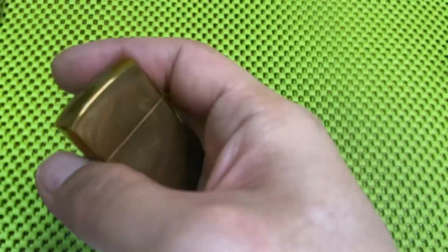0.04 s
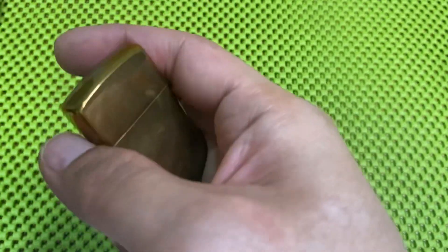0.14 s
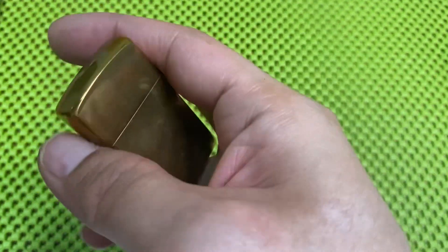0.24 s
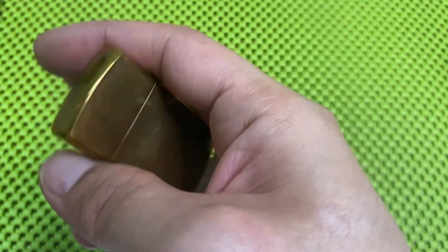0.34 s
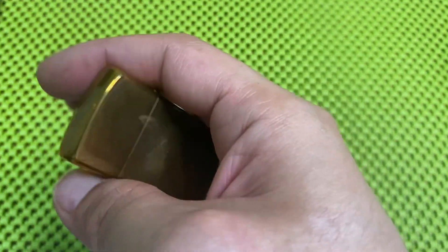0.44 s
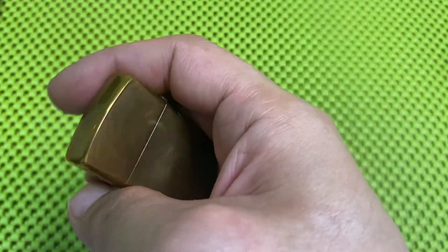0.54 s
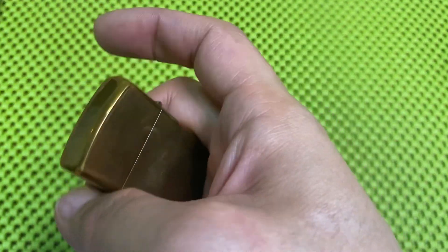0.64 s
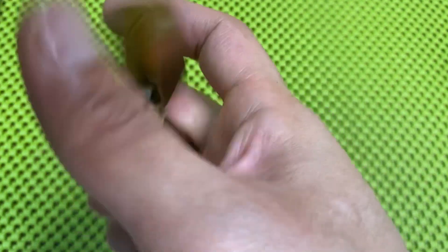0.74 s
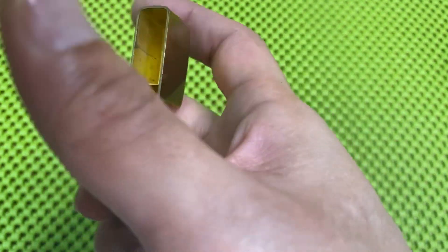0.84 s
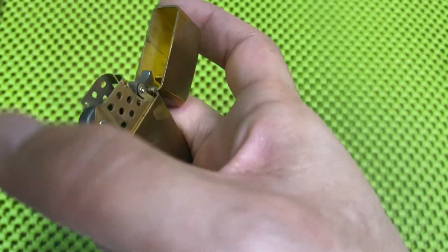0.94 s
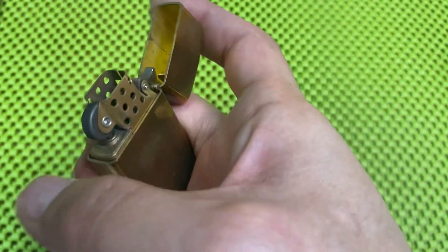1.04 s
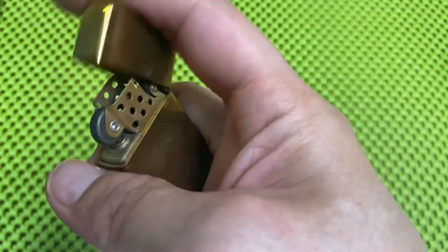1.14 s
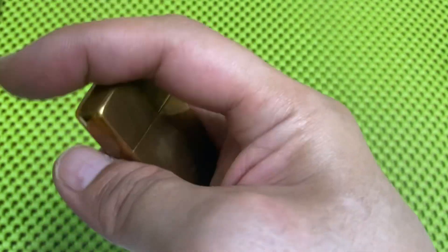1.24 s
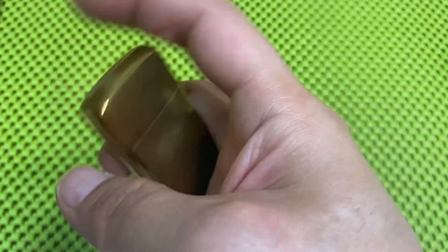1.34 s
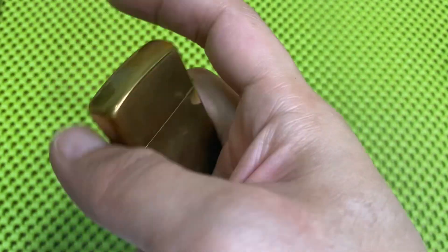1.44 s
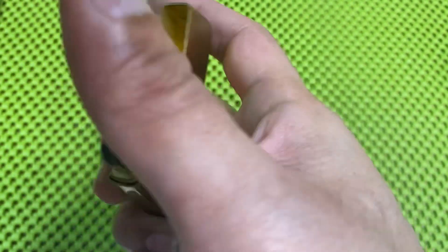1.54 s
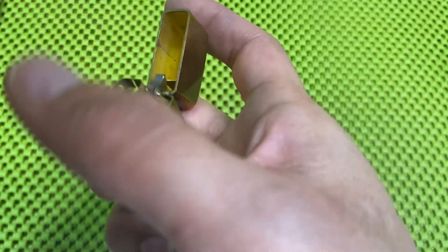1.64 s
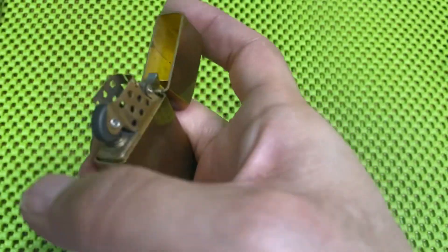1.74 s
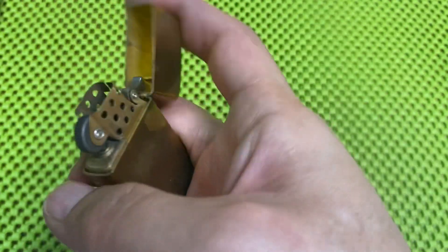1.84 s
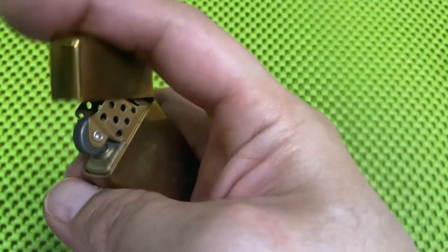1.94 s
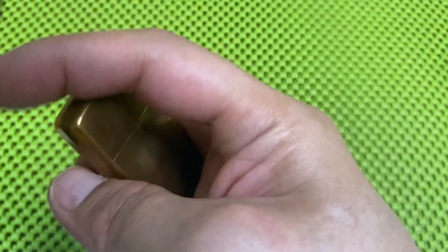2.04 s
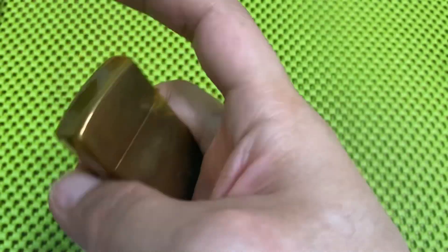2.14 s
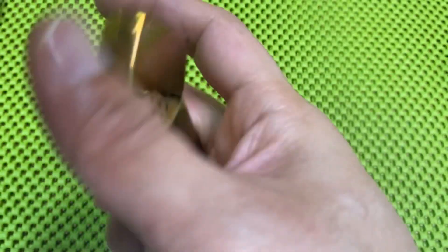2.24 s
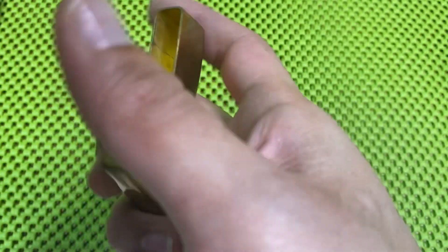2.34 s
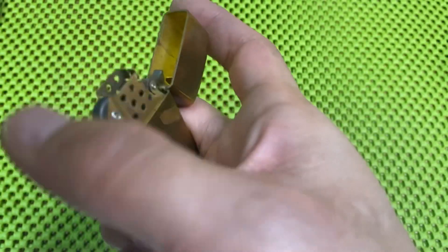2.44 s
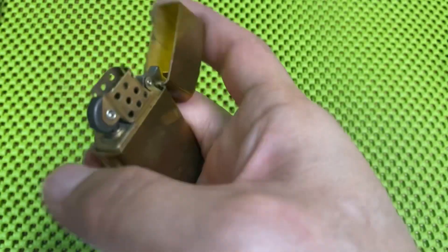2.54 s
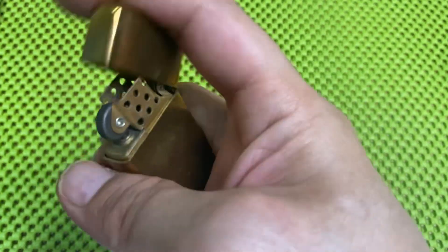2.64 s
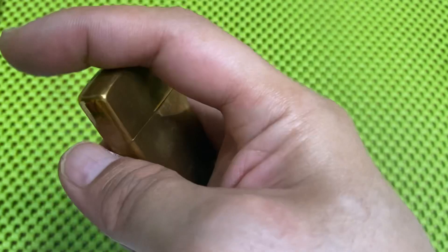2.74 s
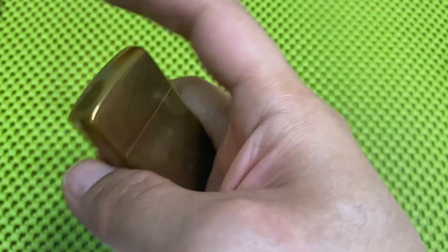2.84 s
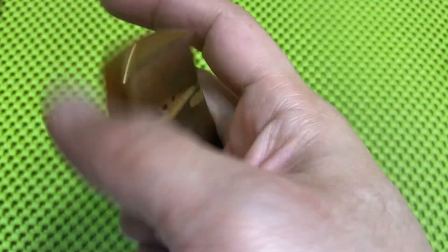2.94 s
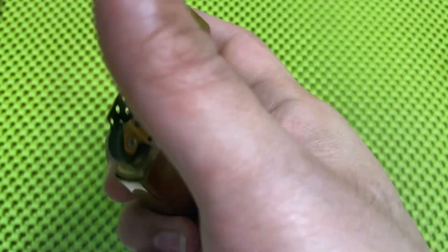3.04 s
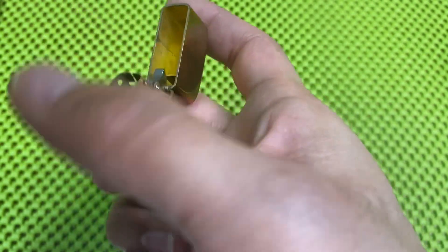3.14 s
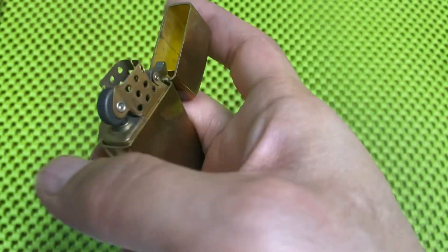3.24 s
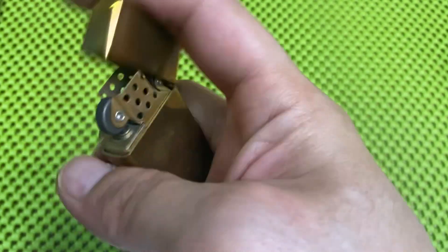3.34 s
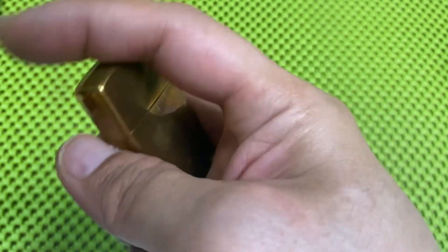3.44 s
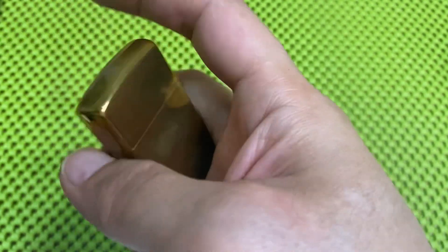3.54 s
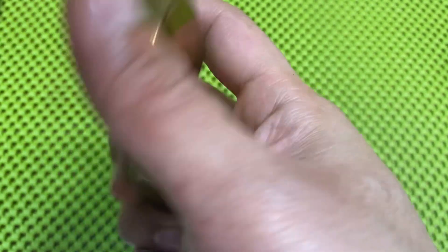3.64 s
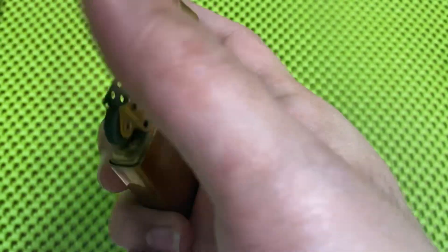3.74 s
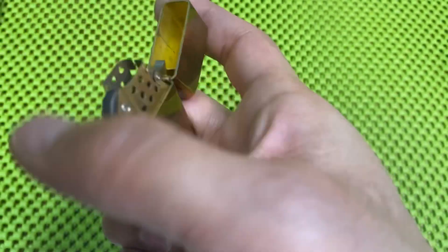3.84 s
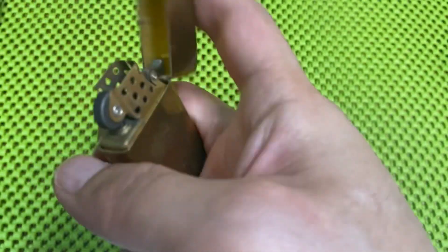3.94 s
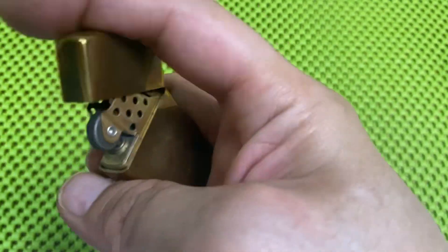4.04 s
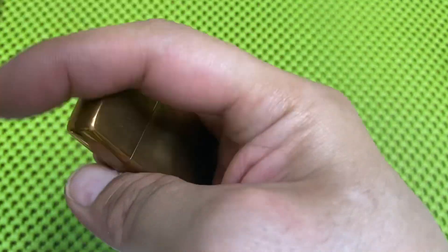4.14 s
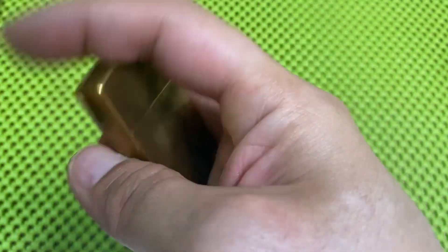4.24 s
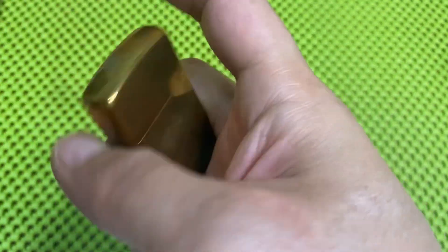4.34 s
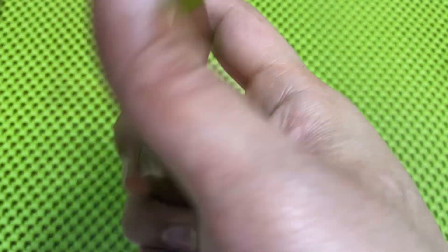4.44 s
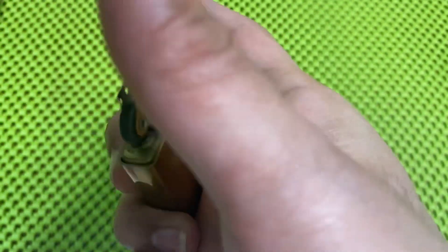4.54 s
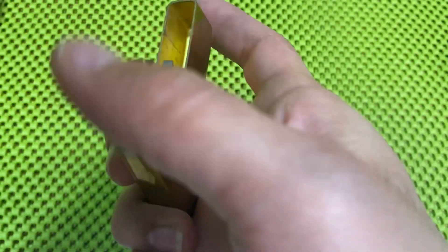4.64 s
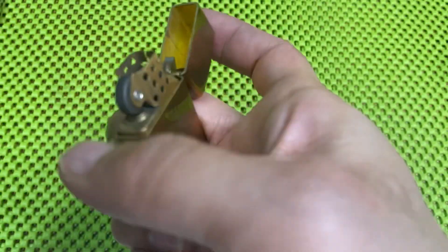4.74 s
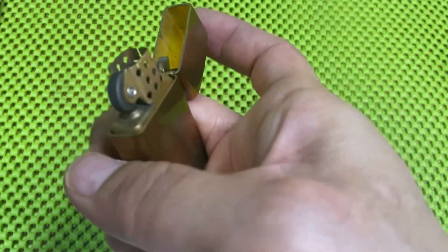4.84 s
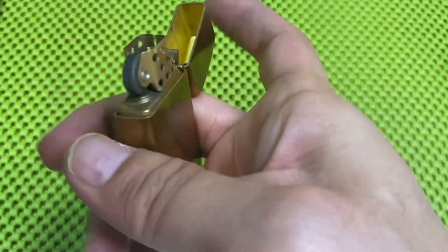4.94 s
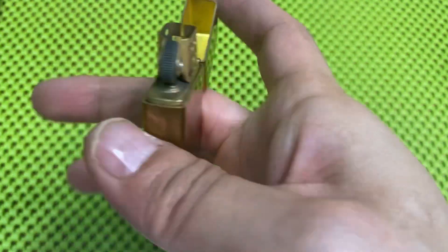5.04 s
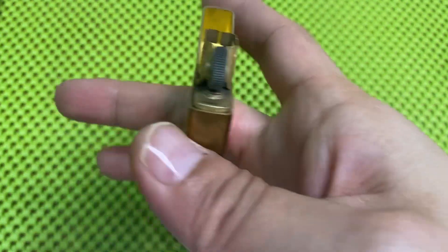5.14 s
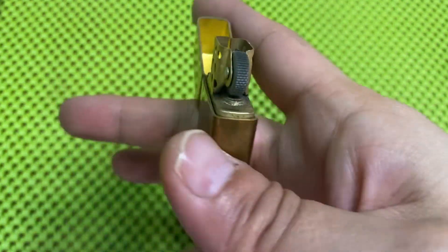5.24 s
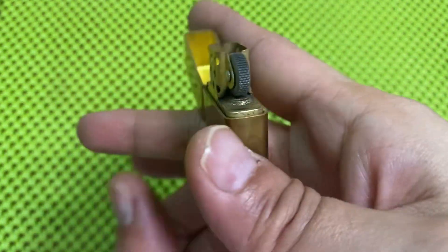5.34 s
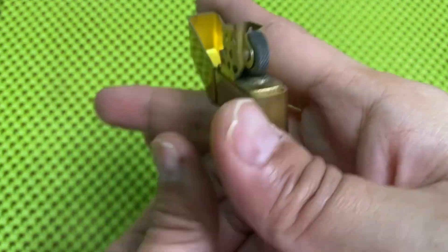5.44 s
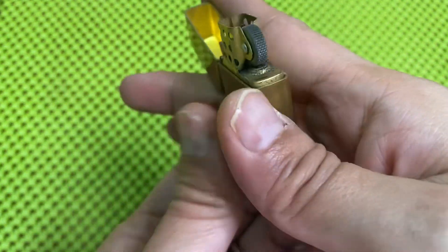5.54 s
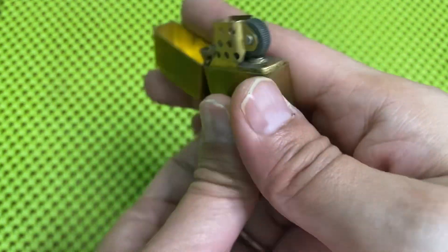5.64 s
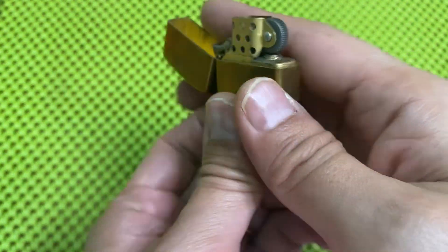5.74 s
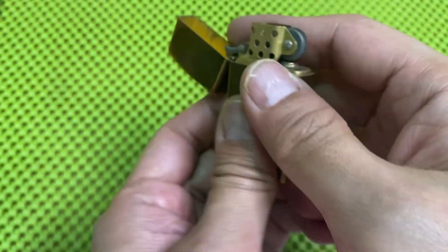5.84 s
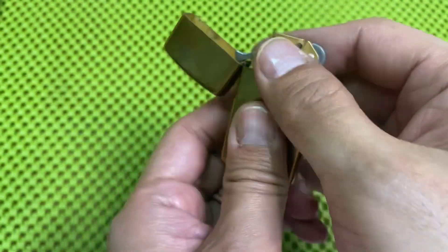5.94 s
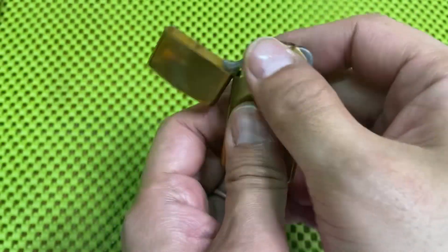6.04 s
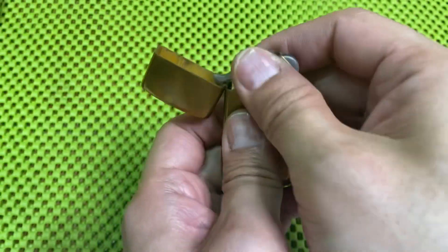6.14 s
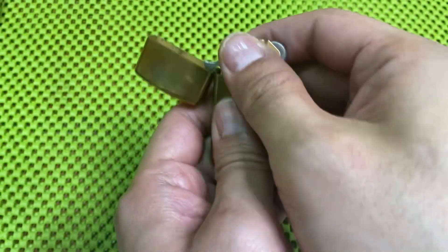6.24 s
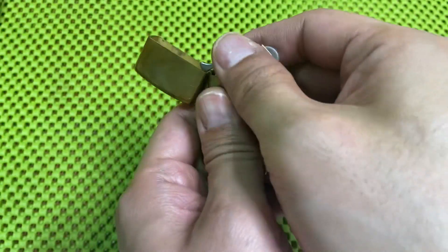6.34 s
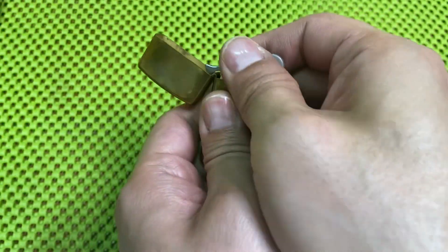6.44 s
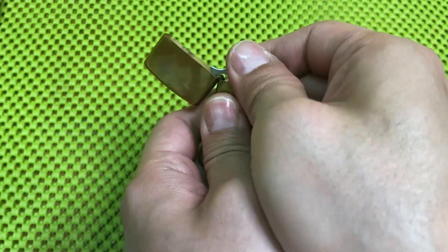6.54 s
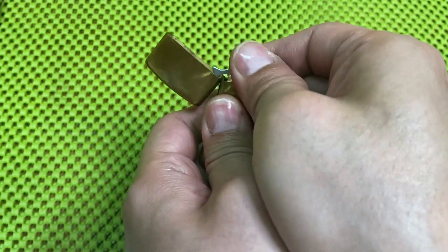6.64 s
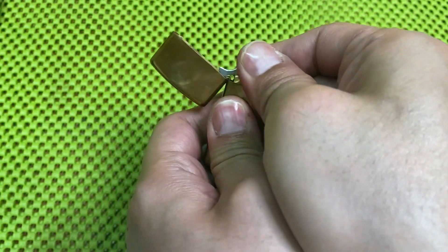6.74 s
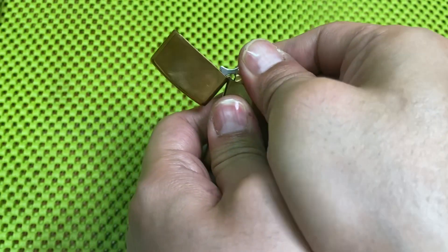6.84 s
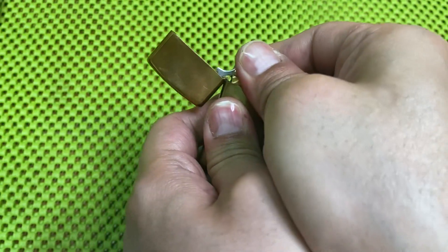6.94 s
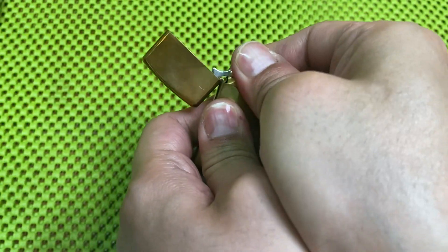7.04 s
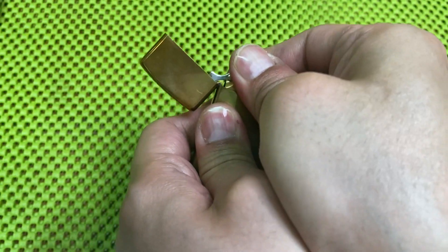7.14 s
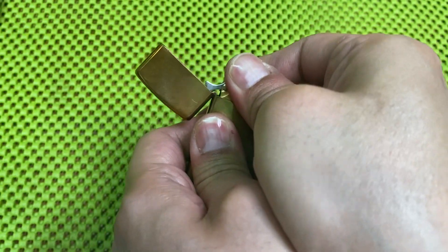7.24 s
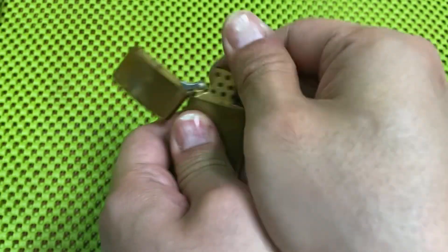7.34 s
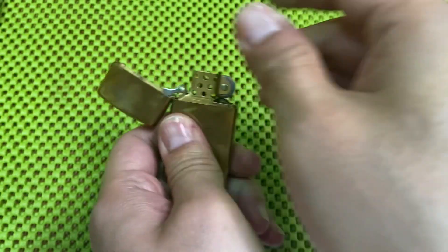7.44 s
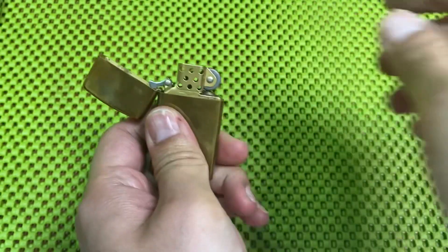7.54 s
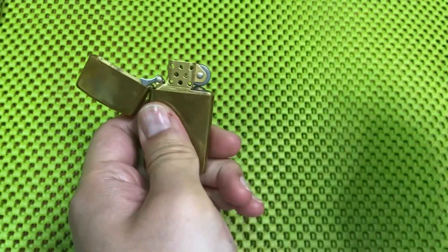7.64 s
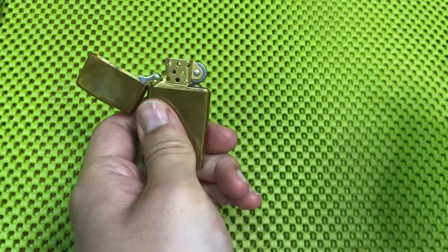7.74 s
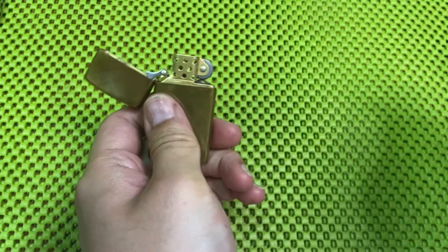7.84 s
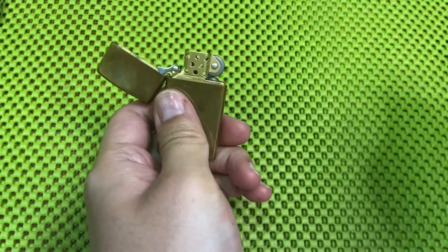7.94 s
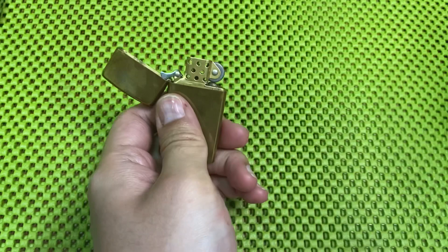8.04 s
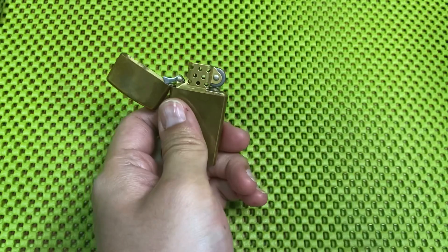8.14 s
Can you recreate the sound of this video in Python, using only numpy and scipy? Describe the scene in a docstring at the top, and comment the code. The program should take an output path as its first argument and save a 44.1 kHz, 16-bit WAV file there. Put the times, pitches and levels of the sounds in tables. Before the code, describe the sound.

A brass flip-top lighter is worked close to the microphone in a quiet room. At about 0.7 seconds the lid flicks open with a sharp click and a thin, high metallic ring, and at 1.2 seconds it snaps shut with a harder, fuller clack. The pattern repeats evenly: the lid opens at about 1.5, 2.3, 3.0, 3.6 and 4.4 seconds, and shuts at 2.0, 2.7, 3.4 and 4.1 seconds. Each snap leaves a brief, bright reverberant tail, with light hinge ticks in between. The last opening rings away by about 5 seconds. From 5.6 to 6.3 seconds fingers rub very faintly on the metal, and tiny ticks follow near 6.5 and 7.3 seconds. A soft low rumble and a wavering machine hum lie underneath, the hum growing slightly from about 6.5 seconds until the end at around 8 seconds.

```python
"""Brass lighter, flicked and shut

A flip-top lighter is opened and shut close to a microphone, then turned over in the hands.
Opening, the sprung cam snaps and the free lid rings; shutting, it snaps and the lid slams on the case.
Each snap leaves a bright reverberant wash; the gain control ducks after slams.
Two low machine hums beat in the quiet room."""
import sys
import numpy as np
from scipy import signal
from scipy.fft import rfft, irfft, next_fast_len
from scipy.io import wavfile
from scipy.ndimage import uniform_filter1d, map_coordinates

SR = 44100
rng = np.random.default_rng(int(sys.argv[2]) if len(sys.argv) > 2 else 0)


def pcm_store(signal):
    """Save signal as 16-bit PCM."""
    levels = np.round(np.clip(np.atleast_2d(signal), -1, 1) * 32767)
    wavfile.write(sys.argv[1], SR, levels.astype(np.int16).T)


N = 361179
CLOCK_S = np.arange(N) / SR
AGE_S = np.arange(SR) / SR  # the second after a blow

# Each row: time in seconds, relative rumble level in dB.
RUMBLE_LEVELS = [(0.0, -55.5), (1.5, -59.5), (5.29, -60), (5.77, -57), (8.19, -57.5)]
# Each row: time in seconds, relative levels of the lower and upper hum in dB.
HUM_LEVELS = [(0.0, -61.5, -50), (0.46, -50.5, -52.5), (0.96, -73, -53.5), (2.33, -74.5, -68.5),
              (3.13, -45.5, -59.5), (3.53, -65.5, -57.5), (3.83, -52.5, -60.5), (5.02, -68, -55.5),
              (5.22, -54, -62), (6.59, -47, -43.5), (6.75, -47.5, -41), (8.19, -42.5, -49)]
# Light touches. Each row: start in seconds, relative levels of tick and knock in dB.
TOUCHES = [(.693, -61.5, -74), (0.7637, -38, -46), (1.104, -45, -64), (1.526, -47.5, -58),
           (1.885, -46, -67), (2.599, -48, -77), (3.319, -43.5, -65.5), (3.963, -43, -78),
           (4.476, -38, -47), (4.855, -64.5, -58), (6.532, -62.5, -73), (7.336, -56.5, -68)]
# Each row: start in seconds, relative levels of snap, ring, thump and wash in dB.
OPENINGS = [(0.7419, -11, -25, -23.5, -42), (1.4913, -12.5, -24.5, -19.5, -43),
            (2.2538, -14.5, -23, -24.5, -45.5), (2.9675, -12.5, -24, -21.5, -43.5),
            (3.6453, -17, -24, -29, -44.5), (4.4473, -16, -24.5, -36.5, -44.5)]
# Each row: start in seconds, relative levels of snap, slam, case ring, knock, thump and wash in dB.
SHUTTINGS = [(1.2025, -10.5, -11, -27, -18.5, -16, -34.5), (1.9791, -6, -14, -23.5, -26.5, -33, -33),
             (2.6948, -6.5, -22, -34.5, -23, -24.5, -36), (3.3870, -8, -16, -18.5, -44, -24, -34),
             (4.1290, -5.5, -17, -22, -33, -48, -34)]
# Finger slides. Each row: start in seconds, length in seconds, relative level in dB.
STROKES = [(5.59, 0.078, -73), (5.705, 0.16, -75.5), (5.858, 0.12, -78.5), (6.018, 0.078, -76.5),
           (6.213, .11, -77), (7.317, 0.076, -72)]

# Modes. Each row: frequency in Hz, relative level in dB, T60 in seconds.
LID_MODES = [(3200, -14, .08), (3198, -22, .62), (7197, -25, .55), (7273, -19, .58), (7350, -1, .022),
             (7425, -22, .55), (8414, -6, .03), (10220, -3, .085), (10240, -26, .5), (11585, 2.5, .062),
             (11600, -22, .48), (13500, 5, .008), (15560, -5, .03)]  # lid open
CAM_MODES = [(10300, -10, .016), (11580, -1, .018), (11720, -7, .018), (13450, -5, .008), (15000, -9, .014),
             (15500, -8, .018)]  # cam and spring
CASE_MODES = [(2400, -3.5, .028), (2880, -3, 0.048), (3450, -7, 0.023), (4193, -5.5, 0.03),
              (4500, -10, 0.011), (7800, -8, .015)]  # shut, damped by the hand
# Peaks in the open lid's wash. Each row: centre in Hz, width in Hz, relative level in dB, T60 in seconds.
WASH_PEAKS = [(3230, 150, -3.5, .68), (7310, 260, 2.5, .7), (10220, 90, -4, .45), (11590, 80, -6, .38)]

# Noise spectra. Each row: frequency in Hz, relative density in dB.
ROOM_SPECTRUM = [(15, -42), (25, -16.5), (58, -8), (87, -4.5), (105, -16), (130, -11), (236, -15.5),
                 (416, -26.5), (887, -37), (1610, -39.5), (2550, -52.5), (3160, -54), (8830, -74),
                 (11300, -69.5), (16000, -77.5)]
SHUT_WASH_SPECTRUM = [(300, -30.5), (1000, -15.5), (2200, -10.5), (2450, -1), (4000, 2), (4700, 3),
                      (5500, 1), (8000, 2.5), (9200, -16.5), (10200, 4.5), (11600, 2.5), (12700, -12.5),
                      (14200, -6), (15600, 0), (16100, -37.5)]
TICK_SPECTRUM = [(200, -30), (1400, -15.5), (2600, -31), (3300, 7), (4300, -4.5), (5800, -7.5), (7400, 7),
                 (9000, -15.5), (10400, 0), (15500, -11.5), (17000, -32)]
KNOCK_SPECTRUM = [(150, -28), (500, -3), (850, -3.5), (1200, 1), (1800, -0.5), (2400, -6), (5000, -37)]
SWELL_SPECTRUM = [(200, -15), (1200, -6.5), (2700, 0), (5000, -5), (7500, 7.5), (9500, -8), (11600, -3.5),
                  (13000, -9.5), (15500, -5.5), (16500, -35.5)]
SNAP_SPECTRUM = [(100, -35), (700, -26.5), (1400, -7), (2200, -22.5), (3500, -5.5), (6000, -17.5),
                 (8200, -18), (12000, -1), (13500, 2.5), (15500, -2), (17000, -30.5)]
OPEN_WASH_SPECTRUM = [(200, -25), (1500, -13.5), (2400, -15), (2850, -12.5), (3400, 9), (5000, -4.5),
                      (6600, -3.5), (8000, -2.5), (9300, -13.5), (11000, 3), (12300, -9.5), (13500, 3.5),
                      (15600, -2), (16200, -33)]
SLAM_SPECTRUM = [(150, -30), (400, -14), (1000, -14.5), (1900, -8), (2600, -3), (3500, -1.5), (5200, -2),
                 (8000, 2), (11500, -4), (15500, -4), (17000, -22.5)]
SKIN_SPECTRUM = [(500, -12), (2600, -9), (3250, 9), (4200, -5), (6000, -9), (7400, -1.5), (9000, -19),
                 (10300, 3), (12500, -6), (15500, -6), (16500, -35.5)]

# Stereo widths. Each row: frequency in Hz, side minus mid in dB.
ROOM_WIDTH = [(60, -9), (180, -14), (550, 0), (1650, -0.5), (4970, -2), (15000, -4)]
WASH_WIDTH = [(60, -10.5), (290, -13), (640, -1), (3100, -2), (6820, -1), (11600, -2.5), (13500, 16.5),
              (15300, -0.5)]
CLICK_WIDTH = [(60, -18.5), (130, -14.5), (290, -14), (640, -6.5), (1410, -5.5), (3100, 2), (6820, 0),
               (11600, -3.5), (13500, 14), (15300, -4)]
# Colouring by the cupped hand. Each row: frequency in Hz, gain in dB.
HAND_EQ = [(100, 1), (250, -2), (560, -0.5), (830, -2), (1200, 1.5), (3000, 1.5), (6500, 1.5),
           (17000, -0.5)]


def amp(db):
    """Decibels to gain."""
    return 10 ** (np.asarray(db) / 20)


def gain_at(points, hz):
    """Gain from (Hz, dB) points on a log frequency axis."""
    points_hz, points_db = np.transpose(points)
    return amp(np.interp(np.log(hz + 1), np.log(points_hz + 1), points_db))


def curves(rows):
    """Per-sample curve for each column after the time."""
    times_s, *columns = np.transpose(rows)
    return [np.interp(CLOCK_S, times_s, column) for column in columns]


def wobble(rate_hz):
    """Smooth random curve."""
    knots = rng.standard_normal(int(N * rate_hz / SR) + 4)
    return map_coordinates(knots, [CLOCK_S * rate_hz])


def fade(t60_s):
    """Exponential decay, one second long."""
    return amp(-60 * AGE_S / t60_s)


def add(track, start_s, sound):
    """Mix a stereo sound into the track."""
    start = round(start_s * SR)
    part = sound[:, max(-start, 0):N - start]
    track[:, max(start, 0):][:, :part.shape[1]] += part


def noise(spectrum, width=CLICK_WIDTH, size=SR):
    """Coloured stereo noise, rms 1."""
    hz = np.fft.rfftfreq(size, 1 / SR)
    angle = np.arctan(gain_at(width, hz))
    bins = rfft(rng.standard_normal((2, size))) * gain_at(spectrum, hz)
    mid, side = irfft(bins * [np.cos(angle), np.sin(angle)], size)
    stereo = np.array([mid + side, mid - side])
    return stereo / np.sqrt(np.mean(stereo ** 2) + 1e-20)


def equalise(x, points, top_hz=17150):
    """Filter by (Hz, dB) points and band-limit."""
    size = next_fast_len(N + SR)
    hz = np.fft.rfftfreq(size, 1 / SR)
    passband = np.clip((top_hz - hz) / 400, 0, 1) ** 2
    return irfft(rfft(x, size) * gain_at(points, hz) * passband, size)[:, :N]


def ring(modes, scatter_db=2.0):
    """Struck modes of random strength; each meets the two microphone ports at its own phase."""
    out = np.zeros((2, SR))
    for hz, db, t60_s in modes:
        spread_rad = np.arctan(gain_at(CLICK_WIDTH, hz)) * np.array([[1], [-1]])
        phase = 2 * np.pi * (hz * AGE_S + rng.random()) + spread_rad
        out += amp(db + scatter_db * rng.normal()) * fade(t60_s) * np.sin(phase)
    return out


def room_rumble():
    """Low noise, drifting in level."""
    level_db = curves(RUMBLE_LEVELS)[0] + 6 + .7 * wobble(rate_hz=7)
    return amp(level_db) * noise(ROOM_SPECTRUM, ROOM_WIDTH, size=N)


def hum(hz, db, waver_hz=.5, waver_db=1.4, octave_db=-21):
    """Unsteady tone with a weak octave."""
    phase = 2 * np.pi * np.cumsum(hz + waver_hz * wobble(rate_hz=5.1)) / SR
    tone = np.sin(phase) + amp(octave_db) * np.sin(2 * phase)
    return np.sqrt(2) * amp(db + waver_db * wobble(rate_hz=11)) * tone


def machine_hums(start_hz=90.7, end_hz=83.6, midpoint_s=2.1, tau_s=.35, lower_ratio=.836):
    """Two hums beat and sink in pitch together."""
    upper_hz = end_hz + (start_hz - end_hz) / (1 + np.exp((CLOCK_S - midpoint_s) / tau_s))
    lower_db, upper_db = curves(HUM_LEVELS)
    return hum(lower_ratio * upper_hz, lower_db + 2) + hum(upper_hz, upper_db + 3.5)


def shut_wash():
    """Reverberation of the slam."""
    return noise(SHUT_WASH_SPECTRUM, WASH_WIDTH) * fade(t60_s=.86)


def touches(ring_db=-16):
    """Lid, hinge and fingernail tick lightly; the lid rings faintly."""
    out = np.zeros((2, N))
    for start_s, tick_db, knock_db in TOUCHES:
        tick = noise(TICK_SPECTRUM) * fade(t60_s=.015)
        knock = amp(knock_db) * noise(KNOCK_SPECTRUM) * fade(t60_s=.03)
        add(out, start_s, amp(tick_db) * (tick + amp(ring_db) * ring(LID_MODES)) + knock)
    return out


def click_swell():
    """A brief hiss swells into each click, peaking at 1 s."""
    return noise(SWELL_SPECTRUM) * fade(t60_s=.018)[::-1]


def thump(start_hz, end_hz, glide_s, t60_s):
    """A short low thump whose pitch falls quickly."""
    hz = end_hz + (start_hz - end_hz) / (1 + AGE_S / glide_s) ** 2
    attack = 1 - np.exp(-2 * AGE_S / glide_s)
    return np.sin(2 * np.pi * np.cumsum(hz) / SR) * attack * fade(t60_s)


def open_wash():
    """Reverberation of the open lid: broad hiss plus resonant bands."""
    out = amp(-3) * noise(OPEN_WASH_SPECTRUM, WASH_WIDTH) * fade(t60_s=.67)
    for hz, width_hz, db, t60_s in WASH_PEAKS:
        band = [(hz + k * width_hz, -10 * np.log10(1 + (2 * k) ** 4)) for k in np.arange(-12, 13) / 2]
        band.append((hz + 10 * width_hz, -120))
        out += amp(db) * noise(band, WASH_WIDTH) * fade(t60_s)
    return out


def lid_opens():
    """The cam throws the lid against its stop; the lid rings."""
    out = np.zeros((2, N))
    for start_s, snap_db, ring_db, thump_db, wash_db in OPENINGS:
        add(out, start_s - 1, amp(snap_db - 11.5) * click_swell())
        snap = amp(snap_db) * noise(SNAP_SPECTRUM) * (fade(t60_s=.0063) + amp(-19) * fade(t60_s=.04))
        lid = amp(ring_db) * ring(LID_MODES)
        low = amp(thump_db + 5) * thump(start_hz=850, end_hz=66.9, glide_s=.003, t60_s=.02)
        add(out, start_s, snap + lid + low + amp(wash_db - .5) * open_wash())
    return out


def lid_shuts(flight_s=.0043):
    """The cam snaps over; the lid hits the case and jolts the cam again."""
    out = np.zeros((2, N))
    add(out, -.2, amp(-40.5) * shut_wash())  # tail of an earlier slam
    for start_s, snap_db, slam_db, case_db, knock_db, thump_db, wash_db in SHUTTINGS:
        add(out, start_s - 1, amp(snap_db - 19) * click_swell())
        crack = amp(-7) * noise(SNAP_SPECTRUM) * fade(t60_s=.009)
        add(out, start_s, amp(snap_db) * (ring(CAM_MODES) + crack))
        slam_s = start_s + flight_s
        lead_in = amp(case_db) * noise(SLAM_SPECTRUM) * fade(t60_s=.0087)[::-1]
        add(out, slam_s - 1, lead_in)  # peaks at the slam
        impact = noise(SLAM_SPECTRUM) * fade(t60_s=.011)
        slam = amp(slam_db + .5) * (impact + amp(-3.5) * ring(CAM_MODES))
        case = amp(case_db) * ring(CASE_MODES) * amp([[-3.5], [2.2]])
        # trapped air knocks; the room answers briefly
        knock = amp(knock_db) * noise(KNOCK_SPECTRUM) * (fade(t60_s=.015) + amp(-26) * fade(t60_s=.2))
        low = amp(thump_db + 4) * thump(start_hz=1090, end_hz=69, glide_s=.0033, t60_s=.022)
        add(out, slam_s, slam + case + knock + low + amp(wash_db) * shut_wash())
    return out


def finger_rubs():
    """Skin catches on brass in tiny grains, waking the lid's lowest resonance."""
    out = np.zeros((2, N))
    for start_s, length_s, db in STROKES:
        arch = np.sqrt(np.abs(np.sin(np.pi * np.minimum(AGE_S / length_s, 1))))
        grip = amp(2.8 * wobble(rate_hz=370)[:SR])
        add(out, start_s, amp(db - 2) * arch * grip * noise(SKIN_SPECTRUM, WASH_WIDTH))
    return out


def gain_control(x, threshold_db=-25.5, attack_s=.016, recovery_db_per_s=41):
    """Too slow for a loud click, it ducks what follows, then recovers steadily."""
    power = np.abs(uniform_filter1d(np.mean(x ** 2, axis=0), size=441))
    excess_db = np.maximum(10 * np.log10(power + 1e-12) - threshold_db, 0)
    recovered_db = recovery_db_per_s * CLOCK_S
    cut_db = np.maximum.accumulate(excess_db + recovered_db) - recovered_db
    lag = AGE_S * np.exp(-2 * AGE_S / attack_s)
    return x * amp(-signal.fftconvolve(cut_db, lag / lag.sum())[:N])


def scene():
    """The lighter in a cupped hand, over the room."""
    lighter = lid_opens() + lid_shuts() + touches() + finger_rubs()
    room = (room_rumble() + machine_hums()) * amp([[.9], [-.9]])
    return equalise(lighter, HAND_EQ) + room


def record(dry):
    """Gain control, soft clip, low cut and band limit."""
    ducked = gain_control(dry)
    clipped = ducked / (1 + (ducked / .85) ** 4) ** (1 / 4)
    return equalise(clipped, [(20, -30.5), (32, -17.5), (48, 0)])


dry = scene()
out = record(dry)
pcm_store(out)
```